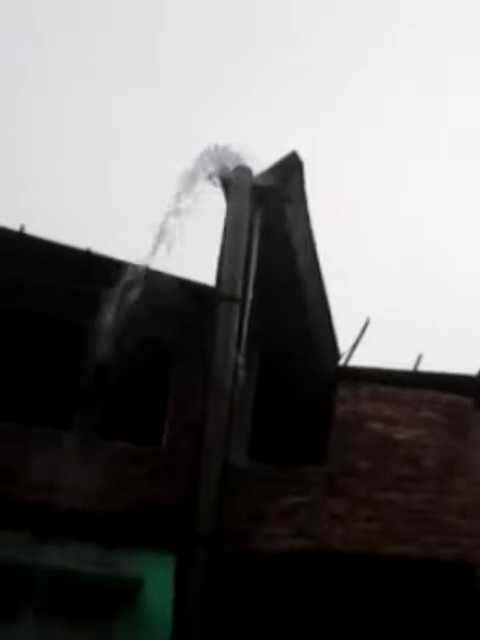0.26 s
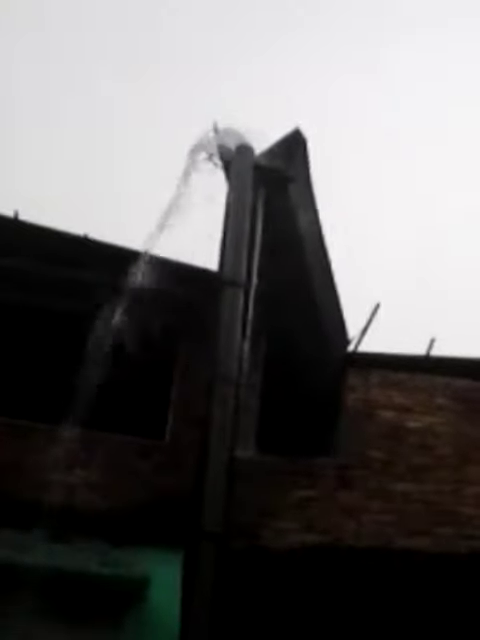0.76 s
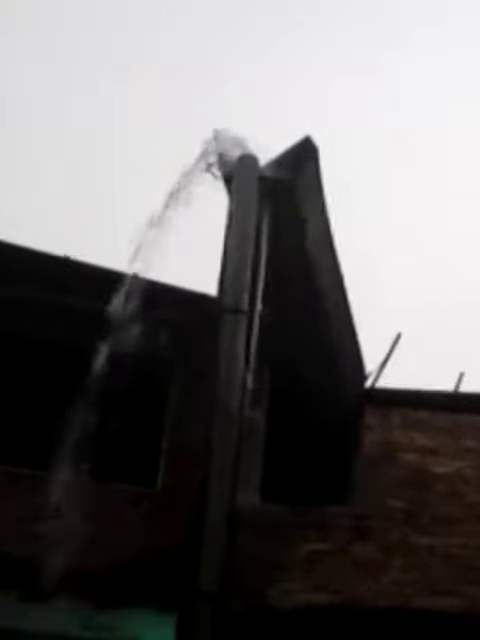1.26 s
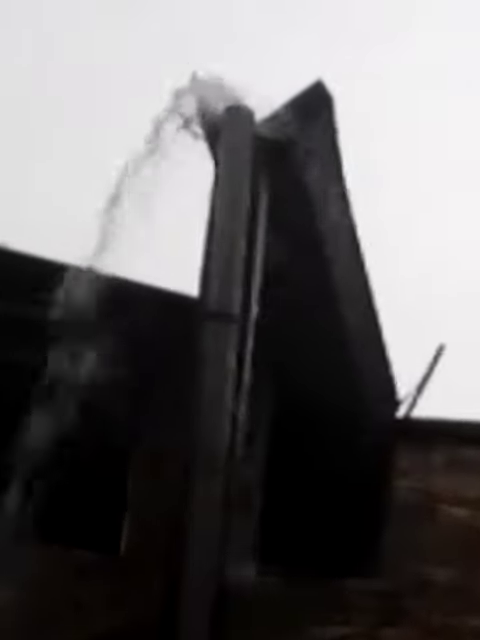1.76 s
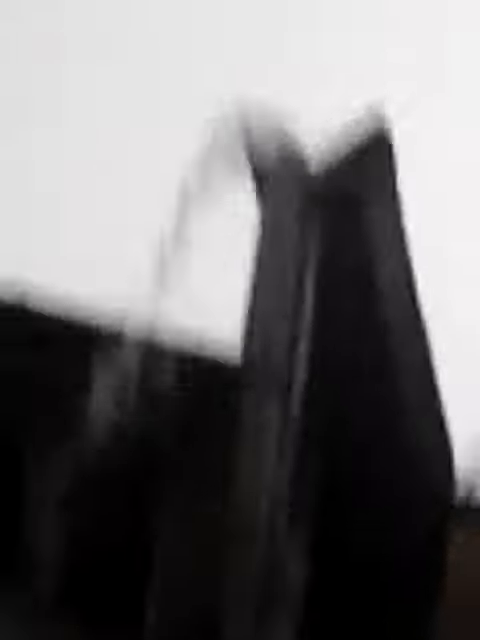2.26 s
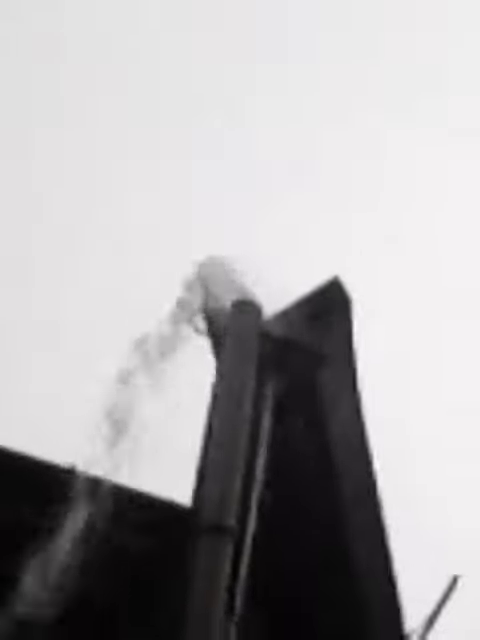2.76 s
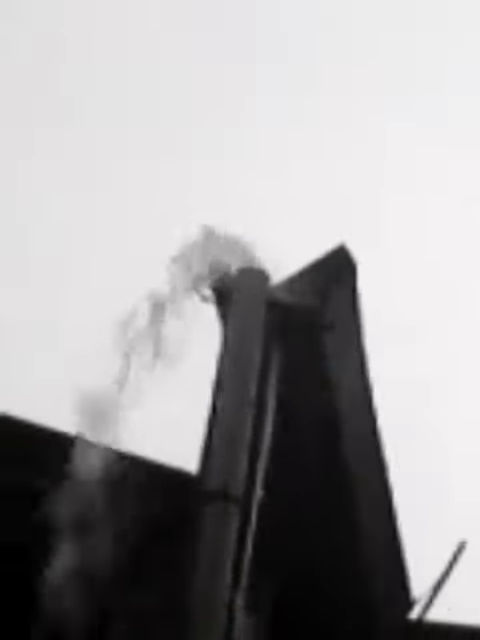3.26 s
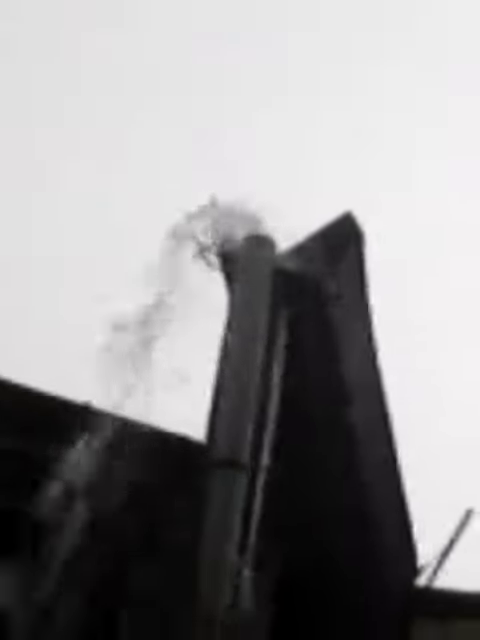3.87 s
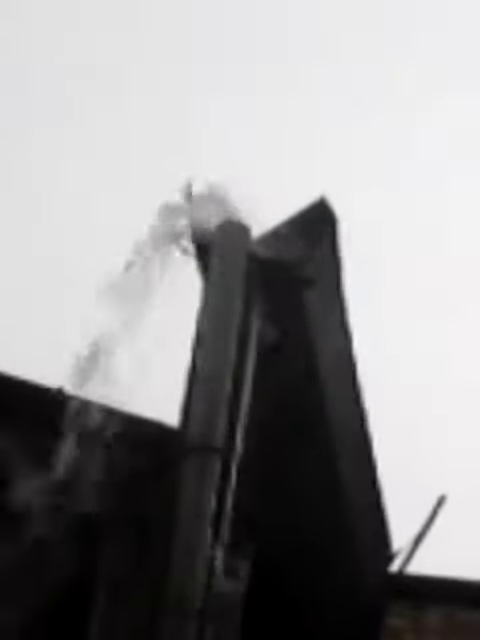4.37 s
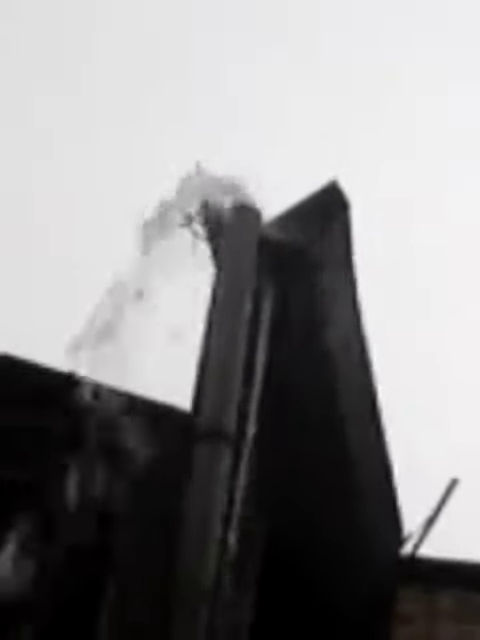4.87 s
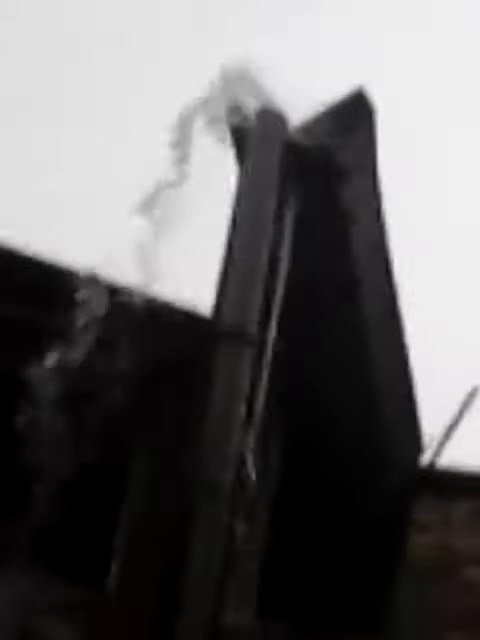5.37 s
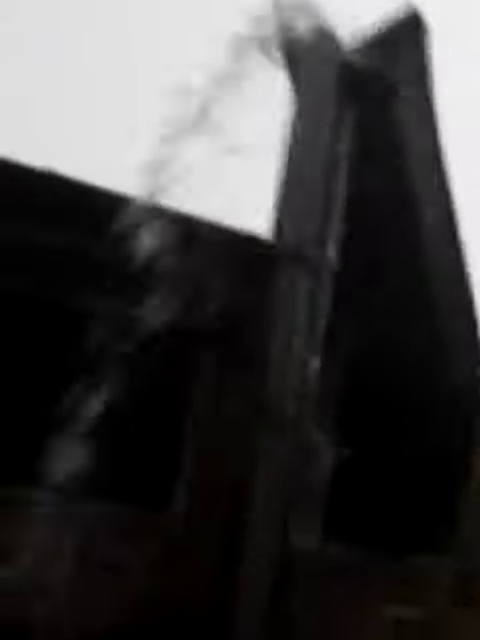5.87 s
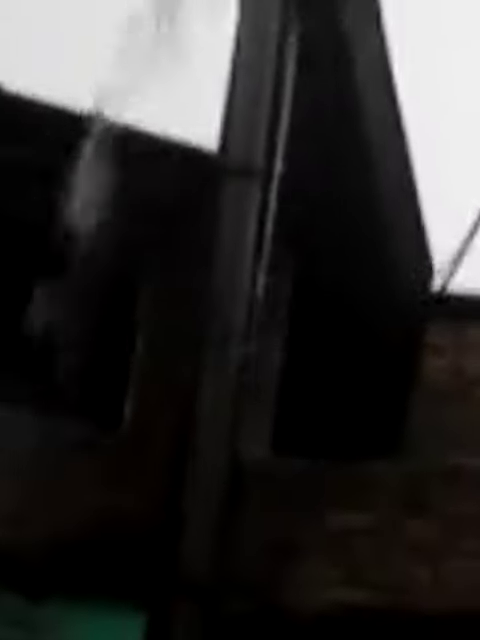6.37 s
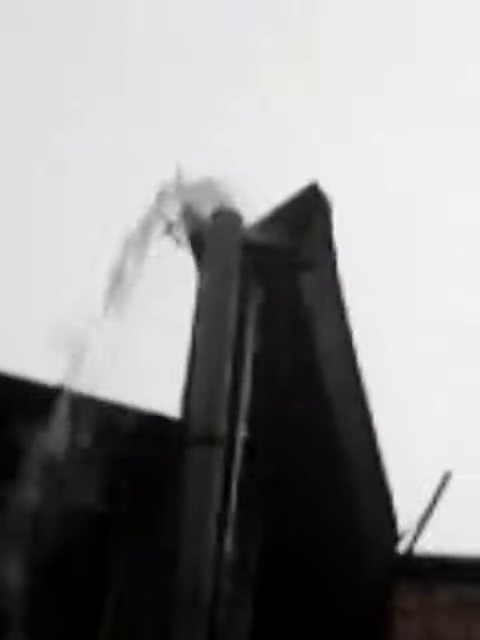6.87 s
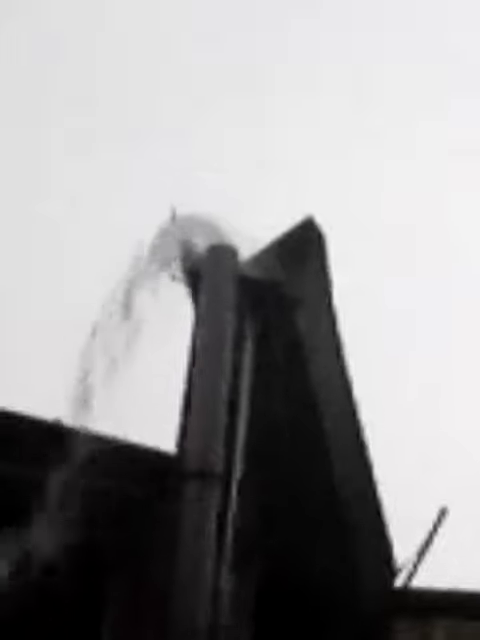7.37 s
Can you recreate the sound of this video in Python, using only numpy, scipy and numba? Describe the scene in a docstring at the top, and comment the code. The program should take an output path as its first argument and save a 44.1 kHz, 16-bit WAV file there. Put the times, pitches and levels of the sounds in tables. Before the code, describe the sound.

Heavy rain hisses while water from a roof drainpipe splatters on wet ground and now and then drums on an awning.

```python
"""A stream spouts over from a roof drainpipe and splatters on wet ground, in heavy rain between buildings.
It breaks into clumps whose impacts and small bubbles hiss, brighter and duller as the stream sways
and the mono phone below turns. Now and then gouts drum on something hollow, probably an awning,
and excite its damped modes. Behind, countless raindrops sum to a wash and bubbles ring in puddles."""
import sys
import numpy as np
from scipy import signal
from scipy.fft import rfft, irfft, next_fast_len
from scipy.io import wavfile
from scipy.ndimage import uniform_filter1d
from numba import njit

SR = 44100
rng = np.random.default_rng(int(sys.argv[2]) if len(sys.argv) > 2 else 0)


def put_to_file(sound):
    """Save the sound as 16-bit audio at rate SR, in the file named by the first command-line argument."""
    columns = np.atleast_2d(sound).T  # one column per channel
    safe = np.clip(columns, -1, 1)
    whole_steps = np.round(safe * 32767)
    wavfile.write(sys.argv[1], SR, whole_steps.astype(np.int16))


N = 335601
T = np.arange(N) / SR

# Splatter of the swaying stream. Each row: time in seconds, relative level in dB.
STREAM_LEVELS = [(0.0, -21.5), (0.08, -21.5), (1.53, -23), (1.55, -19), (1.72, -23.5), (2.23, -22),
                 (2.27, -31), (2.29, -25.5), (2.71, -37), (3.07, -24.5), (4.3, -24), (4.58, -27),
                 (4.68, -23), (4.72, -24.5), (5.38, -27.5), (5.7, -42.5), (6.0, -21), (6.1, -29.5),
                 (6.61, -43), (6.65, -31), (6.91, -28), (6.95, -28), (7.0, -28.5), (7.61, -20.5)]
# Brightness of the splatter. Each row: time in seconds, nominal centre of the hiss in Hz.
STREAM_BRIGHTNESS = [(0.0, 4840), (0.08, 4600), (1.1, 5070), (1.17, 4820), (2.01, 5200), (2.46, 3790),
                     (3.94, 4400), (5.24, 4440), (5.68, 3660), (5.95, 4440), (6.4, 3660), (7.61, 4860)]
# Large clumps slapping down. Each row: peak time in seconds, relative peak in dB, fade in seconds.
CLUMP_SLAPS = [(0.011, -20.5, .15), (0.356, -21, 0.023), (0.399, -19, 0.0078), (0.67, -20.5, 0.057),
               (0.938, -24, 0.01), (1.271, -20, .03), (1.548, -22, 0.078), (1.95, -23, 0.045),
               (3.06, -22.5, 0.13), (3.36, -21, 0.15), (3.87, -18, 0.085), (4.654, -20, 0.057),
               (4.99, -19, 0.057), (5.32, -20.5, 0.082), (5.865, -21, 0.094), (6.004, -18, 0.027),
               (6.651, -22, 0.15), (6.939, -18.5, 0.086), (7.317, -17.5, 0.048), (7.512, -24, 0.029)]
# Spectrum of the fine spray. Each row: frequency in Hz, relative level in dB.
SPRAY_SPECTRUM = [(40, -48), (200, -38), (900, -3.5), (2000, 3.5), (2900, 8.5), (5500, -6), (7500, 5),
                  (9500, 5), (12500, 3), (15500, 1)]
# Gouts on the awning. Each row: peak time in seconds, relative peak in dB, rise and fade in seconds.
AWNING_GOUTS = [(1.62, -12.5, 0.03, 0.1), (1.70, -17, .02, .15), (1.80, -13, 0.028, 0.19),
                (1.97, -18, 0.045, 0.15), (2.14, -18, 0.044, 0.18), (2.38, -24, 0.074, 0.25),
                (3.12, -25.5, 0.3, 0.23), (3.28, -21, 0.046, 0.086), (3.39, -22.5, 0.028, 0.088),
                (3.631, -19, 0.081, 0.12), (3.84, -15.5, 0.037, 0.038), (3.89, -22, 0.022, 0.097),
                (4.3, -29, 0.47, 0.63), (4.66, -21.5, 0.025, .06), (4.80, -24.5, 0.045, 0.35),
                (4.99, -22.5, .09, 0.072), (5.72, -34.5, .15, 0.13), (6.5, -32.5, 0.5, 0.23),
                (7.55, -35, .2, .2)]
# Modes of the awning. Each row: frequency in Hz, bandwidth in Hz, relative level in dB.
SHEET_MODES = [(253, 12.6, -11), (394.5, 26, -11)]
# Spectra of the awning's thud and smack. Each row: frequency in Hz, relative level in dB.
THUD_SPECTRUM = [(25, -31), (55, -25.5), (85, -14), (115, -4), (180, 2), (250, -0.5), (385, -2),
                 (520, -6.5), (700, -13.5), (1100, -21), (2500, -35), (6000, -32.5)]
SMACK_SPECTRUM = [(100, -28), (500, -1), (800, 6), (1400, -1.5), (3000, -24)]
# Downpour all around. Each row: time in seconds, relative level in dB.
RAIN_LEVELS = [(0.0, -29), (5.28, -29), (5.77, -31.5), (6.02, -27), (6.15, -30), (7.46, -30.5),
               (7.61, -28.5)]
# Spectrum of the downpour. Each row: frequency in Hz, relative level in dB.
RAIN_SPECTRUM = [(20, -60), (60, -36), (120, -17.5), (200, -9.5), (320, -0.5), (680, -2.5), (1080, -0.36),
                 (1600, -1.5), (2100, -.5), (2800, -4), (4200, -6.5), (6500, -15.5), (10000, -22.5),
                 (15500, -18.5)]


def splash(strength, slap_power):
    """Impact and bubble resonance: droplets strike a film of water, making a hiss and a crackling spray."""
    centre_hz, = curves(STREAM_BRIGHTNESS)
    flow = clumps(rate=80, fade_s=.016, depth=.3)
    fizz = bubbles(low_hz=2796, high_hz=15630, cycles=180, glide=0.077, spread_db=-1.0, count=9000)
    hiss = (drops(rate=12000, spread_db=2.4) + undb(-7) * fizz) * flow
    hiss_hz = 1.044 * centre_hz
    for _ in range(4):  # a broad band with steep sides
        hiss = resonate(hiss, hiss_hz, width_hz=hiss_hz)
    crackle = (drops(rate=9000, spread_db=2.0) + undb(-16.5) * fizz) * flow
    spray = colour(crackle, SPRAY_SPECTRUM)
    hiss_level = np.sqrt((undb(-23.5) * strength) ** 2 + undb(-7.5) ** 2 * slap_power)
    thrown = undb(-30.2) * strength * (centre_hz / 4600) ** 1.7  # a brighter hiss throws more spray
    mist = undb(-39)  # fine spray that never stops
    spray_level = np.sqrt(thrown ** 2 + mist ** 2 + undb(-12) ** 2 * slap_power)
    return unit(hiss) * hiss_level + spray * spray_level * undb(1.45 * walk(18))


def clumps(rate, fade_s, depth):
    """Jet break-up: each clump lands at once and adds a surge of power that decays exponentially."""
    landings = (rng.random(N) < rate / SR) * rng.exponential(size=N)
    surge = signal.lfilter([1], [1, -np.exp(-1 / (fade_s * SR))], landings)
    return unit(np.sqrt(1 + depth * surge))


def burst(peak_s, peak_db, rise_s, fade_s):
    """Exponential growth and decay: the power of one mass of water builds up and drains away."""
    age = T - peak_s
    time_constant = np.where(age < 0, rise_s, fade_s)
    return undb(peak_db) ** 2 * np.exp(-2 * np.minimum(np.abs(age) / time_constant, 20))


def awning():
    """Forced vibration: gouts thud on a slack, well damped sheet, each with a lighter smack."""
    patter_power = undb(-45.5) ** 2  # light patter between gouts
    level_db = 10 * np.log10(patter_power + sum(burst(*gout) for gout in AWNING_GOUTS))
    impacts = drops(rate=1800, spread_db=2.5) * undb(0.16 * walk(24.47))
    thuds = colour(impacts, THUD_SPECTRUM)
    modes = np.zeros(N)
    for hz, width_hz, db in SHEET_MODES:
        drive = drops(rate=1800, spread_db=5.5)
        ring = resonate(drive, np.full(N, float(hz)), np.full(N, float(width_hz)))
        modes += undb(db) * unit(ring)
    smack = colour(drops(rate=660, spread_db=4.5), SMACK_SPECTRUM)
    return (thuds + modes) * undb(level_db - 0.5) + smack * undb(1.1 * level_db - 11.5)


def rain(strength, slap_power):
    """Incoherent addition: far drops merge into a wash, near ones plink; the stream swells both."""
    level_db, = curves(RAIN_LEVELS)
    downpour = undb(level_db - 0.58 + 0.12 * walk(8.3))
    level = np.sqrt(downpour ** 2 + (undb(-39) * strength) ** 2 + undb(-9) ** 2 * slap_power)
    wash = drops(rate=14000, spread_db=2.0) * undb(0.73 * walk(22))
    plinks = bubbles(low_hz=494.7, high_hz=4364, cycles=33, glide=0.099, spread_db=8.5, count=2200)
    return level * (undb(3.5) * colour(wash, RAIN_SPECTRUM) + undb(-6.0) * colour(plinks, RAIN_SPECTRUM))


def drops(rate, spread_db):
    """Shot noise: independent impacts, on average `rate` a second, many small and a few large."""
    lands = rng.random(N) < rate / SR
    size = undb(spread_db * np.minimum(rng.exponential(size=N), 6))
    return unit(lands * size * np.sign(rng.standard_normal(N)))


def bubbles(low_hz, high_hz, cycles, glide, spread_db, count):
    """Bubble resonance: air trapped by a drop rings briefly, rising in pitch as it fades by 40 dB."""
    out = np.zeros(N + SR)
    for when, pitch, size in rng.random((count, 3)):
        hz = low_hz * (high_hz / low_hz) ** pitch
        age = np.arange(int(cycles * SR / hz)) * hz / (cycles * SR)  # 0 to 1 over the ring
        phase = 2 * np.pi * cycles * age * (1 + glide * age / 2)
        ring = np.sin(phase) * np.exp(-np.log(100) * age)
        start = int(when * N)
        out[start:start + len(ring)] += ring * undb(spread_db * size)
    return unit(out[:N])


def colour(x, spectrum):
    """Minimum-phase filtering: x rings through a causal body with the given spectrum; rms 1."""
    size = next_fast_len(N) * 2
    hz, db = np.transpose(spectrum)
    bin_hz = np.arange(size // 2 + 1) * SR / size
    log_gain = np.log(undb(np.interp(np.log(bin_hz + 1), np.log(hz), db)))
    cepstrum = irfft(log_gain)[:size // 2]
    response = np.exp(2 * rfft(cepstrum, size))
    return unit(irfft(rfft(x, size) * response)[:N])


@njit
def resonate(x, hz, width_hz):
    """Damped resonance: a state-variable band-pass whose centre and width may move every sample."""
    y, band_state, low_state = np.empty(len(x)), 0., 0.
    for i in range(len(x)):
        tuning, damping = np.tan(np.pi * hz[i] / SR), width_hz[i] / hz[i]
        band = (band_state + tuning * (x[i] - low_state)) / (1 + tuning * (tuning + damping))
        band_state = 2 * band - band_state
        low_state += 2 * tuning * band
        y[i] = damping * band
    return y


def walk(rate):
    """Random modulation: values held for 1 / rate seconds and smoothed twice; rms 1."""
    hold = max(int(SR / rate), 1)
    steps = rng.standard_normal(N)[np.arange(N) // hold]
    return unit(uniform_filter1d(uniform_filter1d(steps, hold), hold))


def curves(rows):
    """Linear interpolation in time of each later column of a table."""
    times, *columns = np.transpose(rows)
    return [np.interp(T, times, column) for column in columns]


def undb(db):
    """Decibels to amplitude ratio."""
    return 10 ** (np.asarray(db) / 20)


def unit(x):
    """Normalisation to rms 1."""
    return x / np.sqrt(np.mean(x ** 2))


def scene():
    """Superposition: three sources reach one microphone; the stream drives both splash and puddles."""
    stream_db, = curves(STREAM_LEVELS)
    full_stream_db, slap_rise_s = -23, 0.0036
    strength = undb(stream_db - full_stream_db)  # 1 when the stream lands squarely
    slap_power = sum(burst(peak_s, db, slap_rise_s, fade_s) for peak_s, db, fade_s in CLUMP_SLAPS)
    mono = rain(strength, slap_power) + splash(strength, slap_power) + awning()
    return np.tile(mono, (2, 1))


def record(dry):
    """Band limiting and saturation: the phone thins the deep bass, rounds peaks and cuts the top."""
    bottom_hz, top_hz, ceiling = 18, 15700, .8
    thin = signal.sosfilt(signal.butter(1, bottom_hz, "high", fs=SR, output="sos"), dry)
    rounded = thin / (1 + (thin / ceiling) ** 4) ** (1 / 4)
    return signal.sosfilt(signal.ellip(14, .1, 90, top_hz, fs=SR, output="sos"), rounded)


dry = scene()
out = record(dry)
put_to_file(out)
```